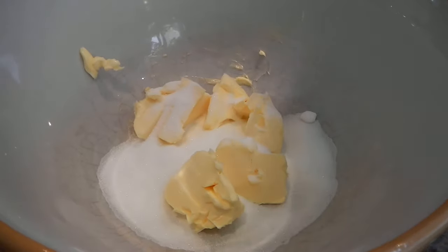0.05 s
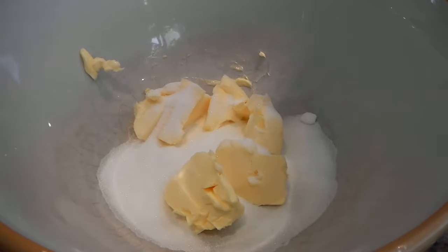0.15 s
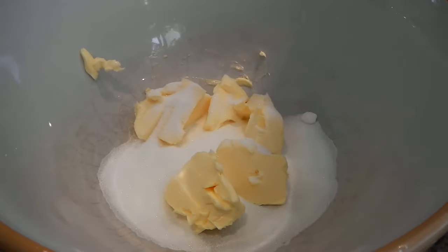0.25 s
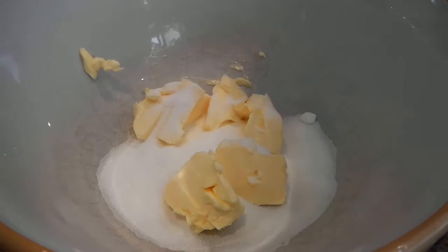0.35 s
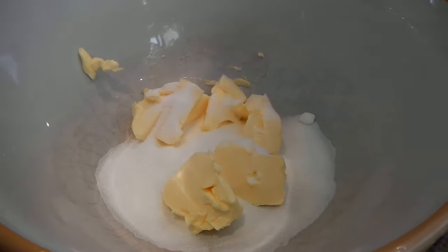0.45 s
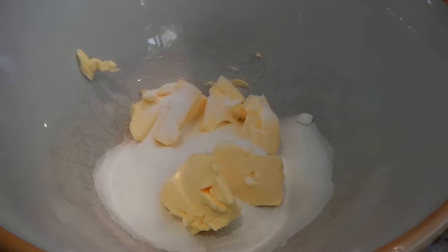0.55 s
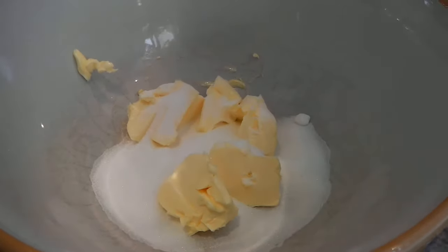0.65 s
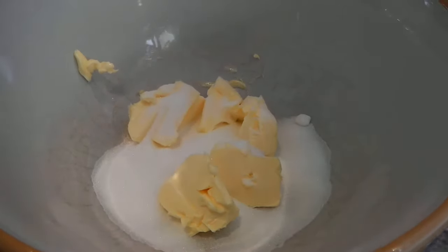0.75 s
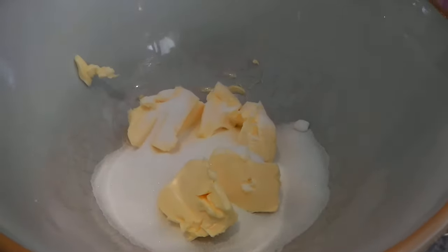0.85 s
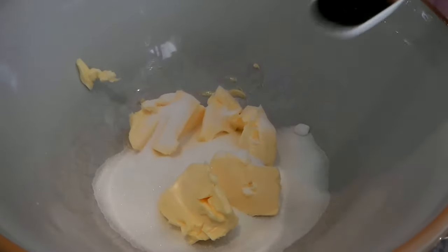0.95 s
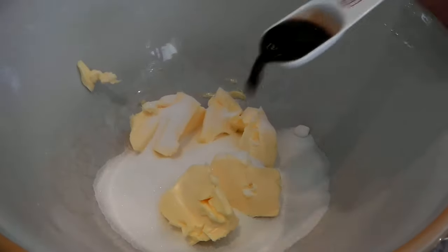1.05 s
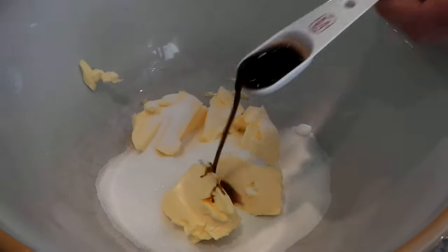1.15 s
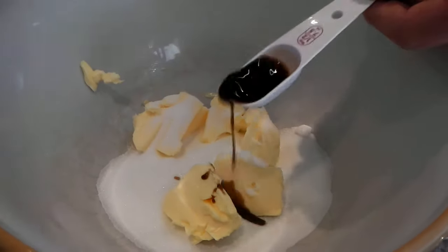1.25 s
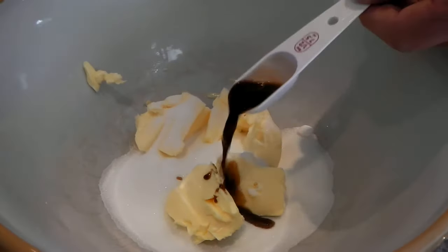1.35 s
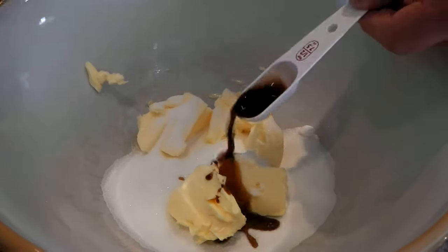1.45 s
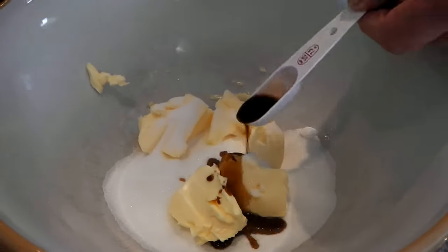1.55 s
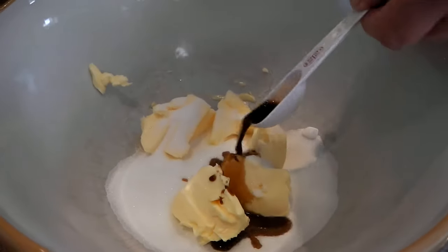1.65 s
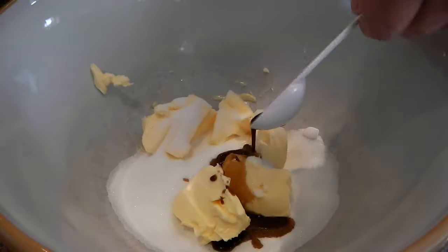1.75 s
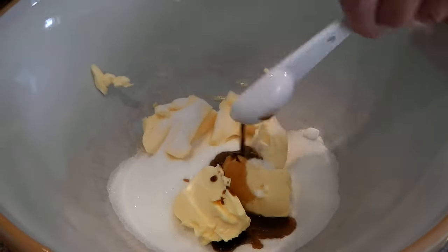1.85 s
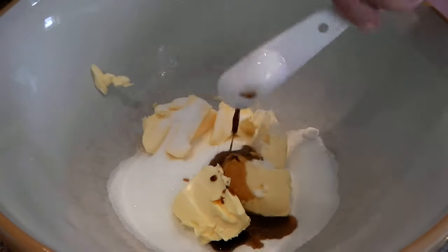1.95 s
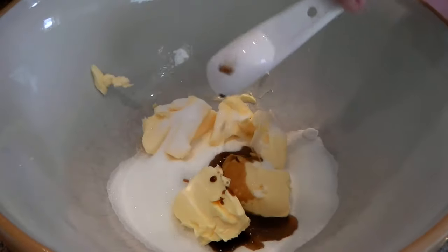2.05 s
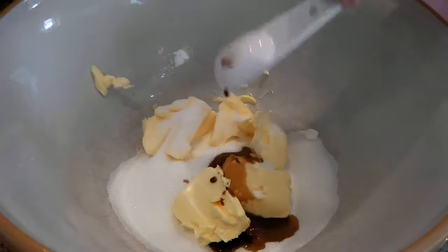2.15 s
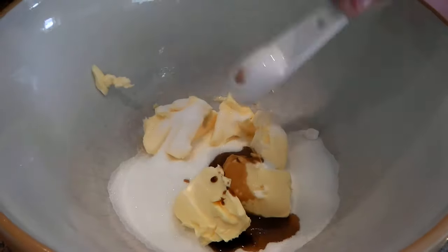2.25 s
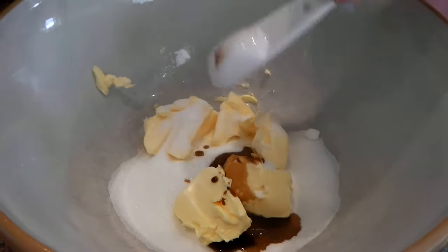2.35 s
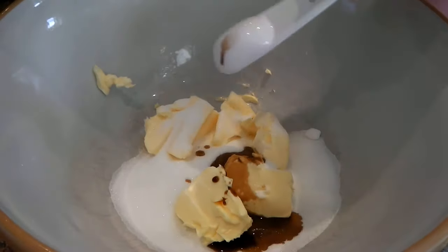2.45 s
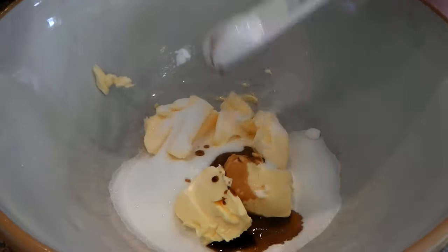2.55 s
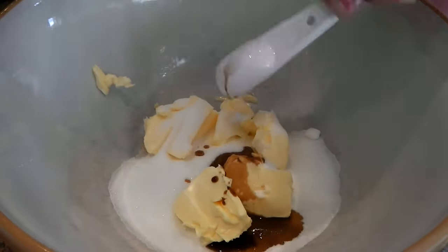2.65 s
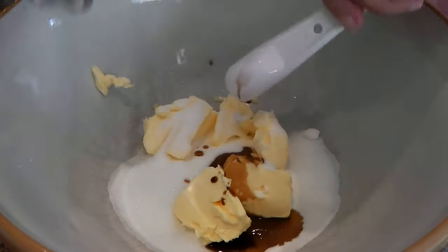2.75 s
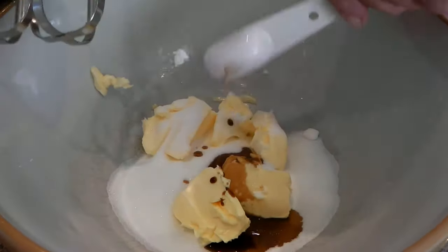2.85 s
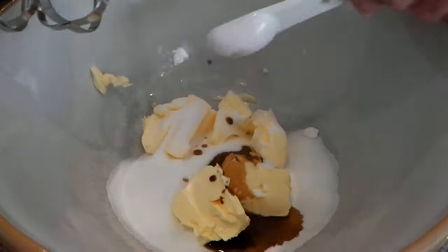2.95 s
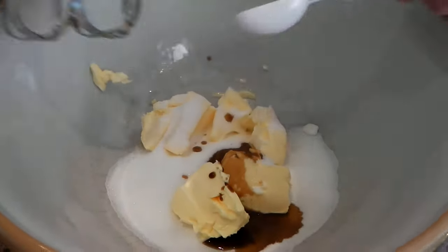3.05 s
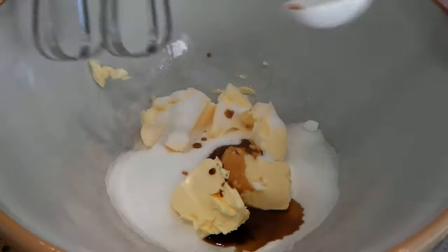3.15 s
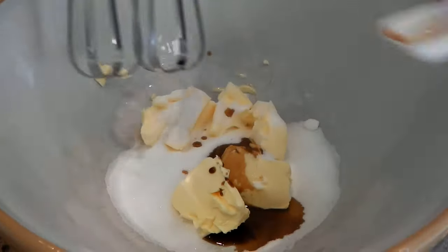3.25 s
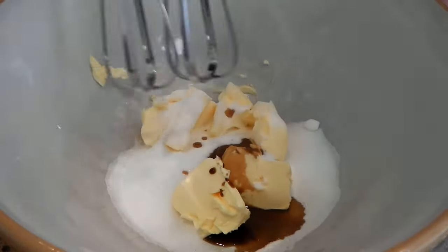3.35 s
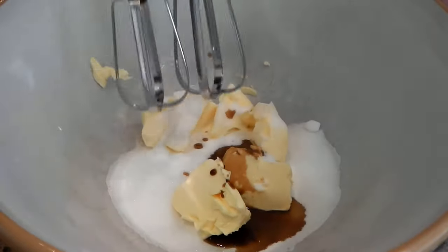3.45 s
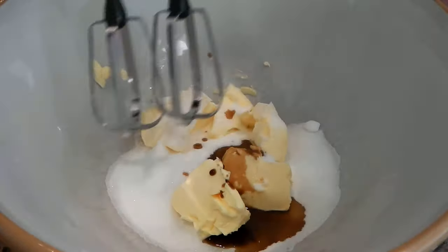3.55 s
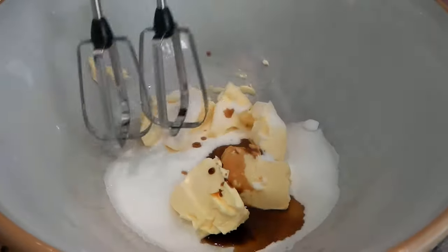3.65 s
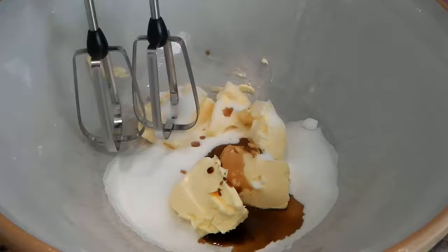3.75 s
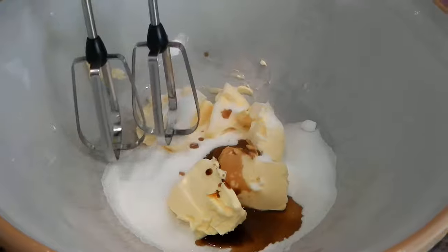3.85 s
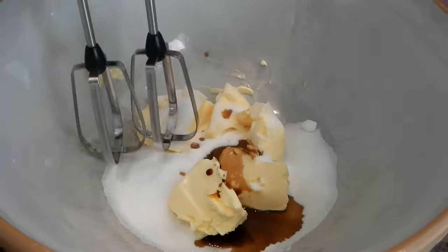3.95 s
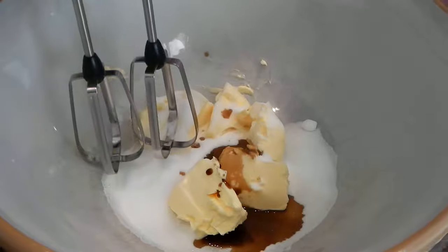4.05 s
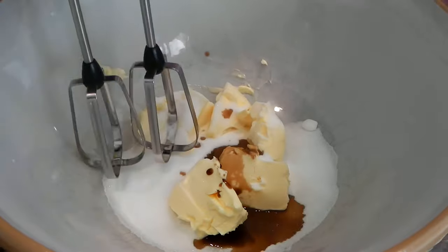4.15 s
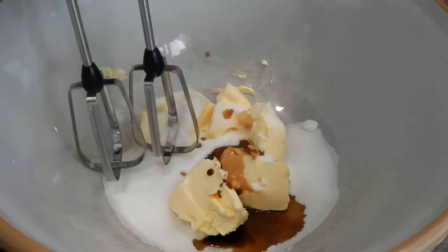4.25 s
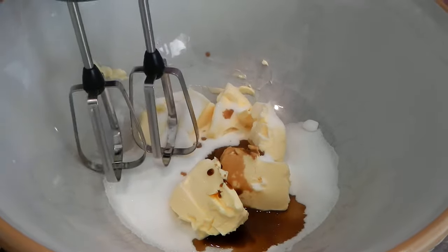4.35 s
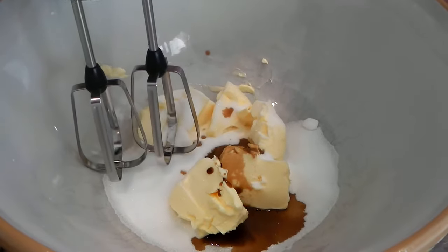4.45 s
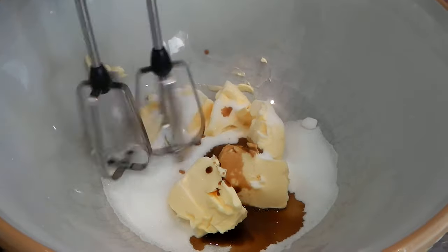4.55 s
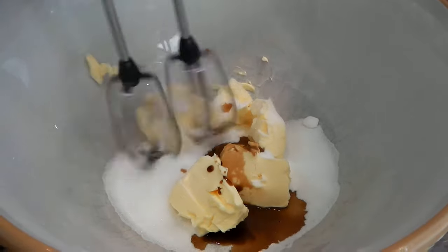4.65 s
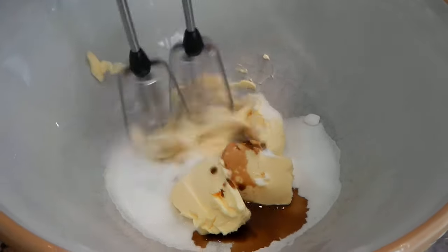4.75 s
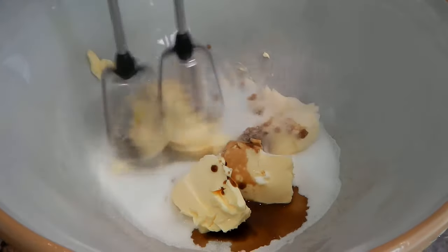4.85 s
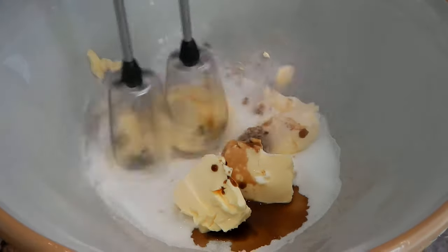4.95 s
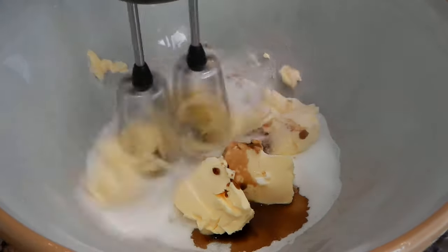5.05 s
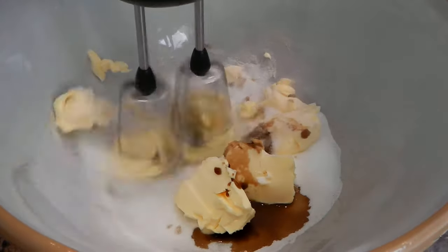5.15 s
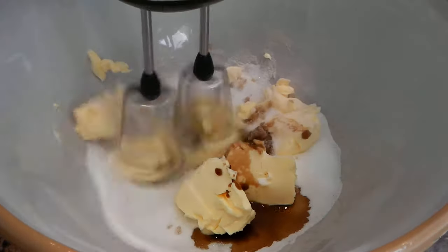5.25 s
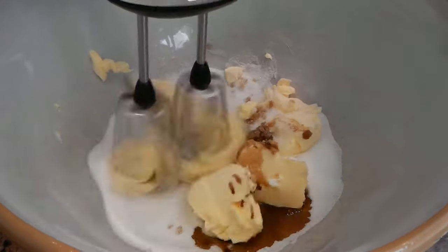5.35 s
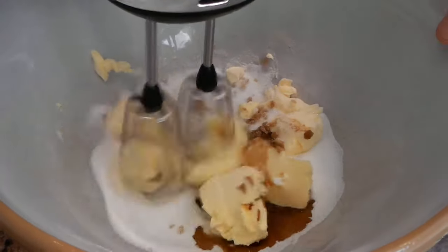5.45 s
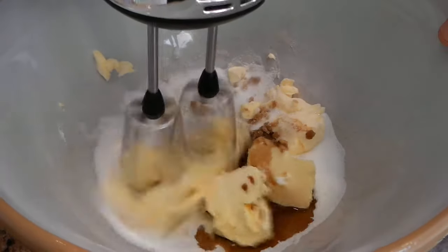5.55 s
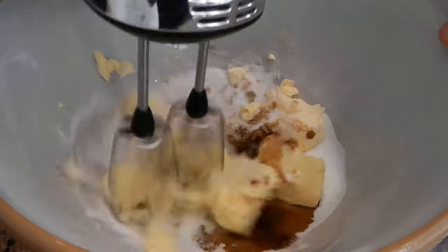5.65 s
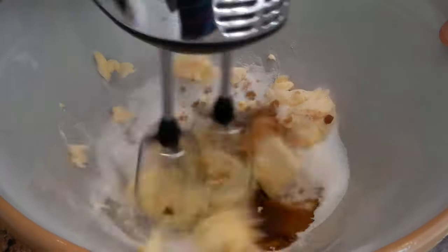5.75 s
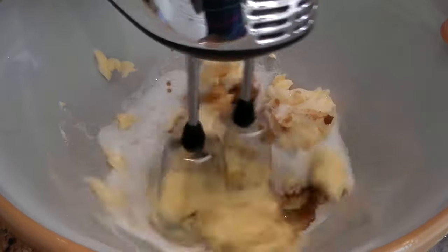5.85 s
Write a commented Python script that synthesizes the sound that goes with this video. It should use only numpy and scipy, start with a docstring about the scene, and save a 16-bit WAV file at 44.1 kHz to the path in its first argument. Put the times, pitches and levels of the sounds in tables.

```python
"""In a quiet kitchen, a spoon clicks and rings as it is emptied into a ceramic bowl of butter and sugar.
A camera's focus motor starts to pip softly, and sleeves rustle. An electric hand mixer is picked up:
its plastic body clicks and knocks, and its steel beaters tap the bowl and rattle in their sockets.
At about 4.5 seconds the switch snaps. The motor growls, then whines up to speed, fluttering with
the mains supply. Last, the beaters sink in and knock the butter about, which slows the motor."""
import sys
import numpy as np
from scipy import signal
from scipy.fft import rfft, irfft, next_fast_len
from scipy.io import wavfile

SR = 44100
rng = np.random.default_rng(int(sys.argv[2]) if len(sys.argv) > 2 else 0)


def file_out(sig):
    """Save sig as 16-bit WAV at sys.argv[1]."""
    # one column per channel
    cols = np.atleast_2d(sig).T
    # limit, then scale
    lim = np.clip(cols, -1, 1)
    pcm = np.round(lim * 32767).astype(np.int16)
    wavfile.write(sys.argv[1], SR, pcm)


N = 260190
TIME = np.arange(N) / SR
PADDED = next_fast_len(N + 8192, True)
HZ = np.fft.rfftfreq(PADDED, 1 / SR)
SWITCH_ON_S = 4.468

# The motor's tones. Each row: multiple of the shaft speed (rounded when used), level in dB when
# running free, level in dB under full load.
MOTOR_TONES = [(3, -29, -45), (4.95, -44, -43), (6, -34, -50.5), (7, -36, -45.5), (9, -42.5, -41.5),
               (13.7, -50, -39.5), (18, -67, -52), (24, -35, -29.5), (28, -58, -35), (30, -60, -51),
               (36, -39.5, -23), (40, -57, -35), (41, -60, -54), (48, -39, -39), (60, -47, -49.5),
               (72.4, -41.5, -62)]
# How well the mixer's case gives off those tones. Each row: frequency in Hz, gain in dB.
HOUSING_GAIN = [(300, -24), (1100, -2.5), (3000, 6), (4750, 0.5), (5700, -9), (7000, 0), (8300, -4),
                (9100, -1), (10600, 4), (11500, 3), (13500, 10), (15200, 10)]
# A quick and a slow stage of speeding up. Each row: turns a second to gain, time constant in seconds.
SPIN_UP_STAGES = [(64.4, .07), (151.4, .361)]
# How deep the beaters sit in the butter. Each row: time in seconds, load from 0 to 1.
BUTTER_LOAD = [(4.85, 0.13), (5.5, 0.88)]
# Lumps caught by the beaters. Each row: middle in seconds, half length in seconds,
# turns a second lost, churning level in dB.
BUTTER_LUMPS = [(4.842, 0.035, 2.77, -39.5), (5.001, .075, 5.2, -52), (5.29, .04, 0.19, -41),
                (5.65, 0.0487, 3.086, -32), (5.834, 0.1, 13.7, -37.5)]

# A colour says how strong a noise is from bass to treble. Each row: frequency in Hz, level in dB.
RUSH_COLOUR = [(150, -26), (300, -17.5), (420, -6), (750, -7), (1150, -2), (1750, -6), (2350, -1.5),
               (2700, -1), (3300, -7), (5300, -5.5), (6200, -9), (8200, -8), (9050, -1), (9800, -5.5),
               (11500, -10), (15500, -12)]  # motor brushes and gears
GROWL_COLOUR = [(120, -66), (200, -25), (456, -29), (735, -8.5), (933, -9.5), (1400, -2), (1910, -19),
                (2380, -7), (4120, -19), (5730, -13.5), (7830, -21.5), (9060, -13), (16000, -24.5)]  # the motor starting
CHURN_COLOUR = [(25, -32), (42, -19), (80, -1), (150, -6), (260, -15.5), (600, -17), (2000, -80)]  # butter thrown about
PLASTIC_COLOUR = [(120, -68), (300, -15), (800, -2.5), (1800, 1.5), (4000, 1.5), (10000, -10), (16000, -29)]  # clicks of spoon and mixer body
BODY_KNOCK_COLOUR = [(120, -21), (300, -14.5), (800, 2.5), (1800, -23), (4000, -39), (10000, -49)]  # dull knocks from the mixer's body
SNAP_COLOUR = [(120, -35), (300, -6), (800, -5), (1800, -5.5), (4000, -6), (10000, -13), (16000, -12)]  # the switch
CLOTH_COLOUR = [(25, -5), (60, 1), (150, -3), (280, -9), (500, 2.5), (1000, -1.5), (1400, 1), (2200, -0.5),
                (3300, -5.5), (6000, -10.5), (9000, -19), (15000, -23.5)]  # sleeves and hands
HISS_COLOUR = [(25, -36), (64, -8.5), (110, -5.5), (200, -12.5), (290, -6.5), (400, -1.5), (800, -6),
               (1250, -10), (5000, -14), (7100, -18), (7900, -22.5), (9100, -17.5), (10200, -27),
               (16000, -27)]  # the background

# Modes are the notes a struck thing rings with. A fade time (t60) is how long a drop of 60 dB takes.
# Each row: frequency in Hz, relative level in dB, fade time in seconds.
BEATER_MODES = [(770, -5.5, 0.062), (1687, -18.5, 0.21), (2140, -4, 0.074), (2300, 3, 0.085),
                (2790, 1.5, 0.04), (3820, -7, 0.076), (4000, -1.5, 0.053), (4470, -1.5, 0.078),
                (5060, 3, 0.092), (4720, -8, 0.061), (5570, -1.5, 0.069), (6350, -4, 0.035),
                (7100, -3, 0.052), (8900, -15, 0.05), (10300, -32, .07), (12830, -25, .07)]
BOWL_MODES = [(716, -27.5, 0.08), (990, -18, 0.0082), (1350, -27, 0.035), (1950, -20, 0.014),
              (2240, -38.5, 0.78), (3120, -8, 0.013), (3860, -4.5, 0.011), (4300, -5, 0.013),
              (5460, -15.5, 0.021), (6100, -22, 0.009), (9400, -27, 0.0091), (12900, -21, 0.011)]
SPOON_MODES = [(2780, 2, 0.24), (3820, -8, .15), (4800, 1, 0.24), (5600, -1, 0.18)]

# Loose beaters rattling. Each row: start in seconds, relative level in dB, brightness in dB an octave.
BEATER_CLINKS = [(4.223, -22, 2.5), (4.242, -27, -0.5), (4.254, -27.5, -5), (4.348, -37, -8.5),
                 (4.360, -41, -10.5), (4.4215, -18.5, 1), (4.431, -26.5, -6.5), (4.438, -25.5, 2)]
# Plastic clicks of spoon and mixer body. Each row: start in seconds, relative level in dB,
# brightness in dB an octave, fade time in seconds.
PLASTIC_CLICKS = [(0.805, -24.5, -0.2, 0.021), (1.125, -41.5, -4.5, .045), (1.418, -41, -5, .03),
                  (1.431, -34, -1.5, .039), (2.689, -37.5, -8.5, 0.026), (3.376, -29, -1, 0.01),
                  (3.382, -27.5, 0, 0.02), (3.487, -32.5, 2, 0.042), (3.638, -36.5, -5, 0.031),
                  (3.674, -34, -3, .025), (3.863, -28, 1, 0.038), (4.058, -30.5, -4, 0.022)]
# Dull knocks from the mixer's body as it is handled. Each row: start in seconds,
# relative level in dB, fade time in seconds.
BODY_KNOCKS = [(3.863, -30, 0.046), (3.965, -28, 0.04), (4.001, -31.5, 0.039), (4.026, -34.5, 0.052),
               (4.045, -29.5, 0.022)]
# Soft bumps on worktop and bowl. Each row: start in seconds, level in dB, frequency in Hz.
SOFT_BUMPS = [(0.938, -40.5, 111), (1.257, -35.5, 136), (1.283, -39, 130), (4.817, -46, 99),
              (5.288, -29, 85.5), (5.612, -47, 143), (5.675, -32, 120)]
# Large steps of the focus motor. Each row: time in seconds, level in dB.
FOCUS_PIPS = [(1.246, -36.5), (1.279, -33), (1.345, -35.5), (1.412, -38.5), (1.445, -32.5), (1.513, -32.5),
              (1.611, -40), (2.079, -32.5), (2.812, -31), (3.314, -35.5), (3.345, -37), (3.38, -38),
              (3.415, -32.5), (3.715, -33.5), (4.146, -32.5), (4.314, -38.5), (4.381, -30.5)]
# Runs of medium steps as it hunts for focus. Each row: start in seconds, end in seconds, level in dB.
FOCUS_HUNTS = [(1.83, 2.0, -42.5), (2.53, 2.73, -46.5), (3.565, 3.665, -43.5)]
# Sleeves and hands brushing along. Each row: loudest moment in seconds, level in dB,
# rise in seconds, fall in seconds, treble gain in dB.
CLOTH_STROKES = [(1.243, -43, 0.027, 0.045, 6.5), (1.44, -47, 0.033, 0.041, -3),
                 (1.54, -49.5, 0.034, 0.032, -12), (1.638, -44.5, 0.028, 0.068, -8.5),
                 (2.59, -52.5, 0.02, 0.032, 4), (3.0, -51.5, 0.07, 0.084, -1),
                 (3.29, -51.5, 0.027, 0.032, 3), (3.395, -44, .03, 0.057, -10),
                 (3.66, -73, 0.078, 0.077, 4), (4.05, -52.5, 0.19, 0.042, -2), (4.45, -59, 0.2, 0.032, 0)]

# The kitchen's echo. Each row: frequency in Hz, fade time in seconds.
KITCHEN_FADE = [(200, 0.62), (2000, 0.26), (6000, 0.22), (14000, 0.083)]
# How alike left and right are. Each row: frequency in Hz, likeness (1 same, 0 unrelated, -1 opposite).
SOURCE_LIKENESS = [(60, .97), (400, .94), (1400, .99), (2300, .96), (3100, .72), (5500, .68), (9000, .45),
                   (15000, .4)]
HISS_LIKENESS = [(60, 0.16), (170, 0.19), (300, -0.35), (5000, -0.48), (15000, -0.05)]
# Which side the motor is louder on. Each row: frequency in Hz, left minus right in dB.
MOTOR_BALANCE = [(100, 1.5), (2400, -1.5), (2700, 1), (3300, 0), (5400, -3), (9000, -3), (15000, -2)]
# Which side its sound reaches first. Each row: frequency in Hz, lead of the left side in radians.
MOTOR_PHASE_LEAD = [(100, .1), (2350, 0), (2660, 1.2), (2850, -.6), (3700, -.2), (5400, -.7), (7500, -1),
                    (10000, -2), (14000, -1.5)]


def mixer():
    """The motor starts with a growl; its whine, tones and rush then follow the speed of the shaft."""
    speed = shaft_speed()
    turns = np.cumsum(speed * (1 + .0015 * drift(25))) / SR
    load = np.clip(curve(BUTTER_LOAD), 0, 1)
    singing = armature_whine(speed, turns, load) + shaft_tones(turns, load)
    rush = brush_rush(speed, turns)
    fade_in = np.clip((TIME - SWITCH_ON_S) / 0.084, 0, 1)
    # the high starting current makes the motor sing louder
    surge = 1 + 0.26 * np.exp(-np.maximum(TIME - SWITCH_ON_S, 0) / 0.045)
    motor = starting_growl() + fade_in * (rush + surge * singing)
    side = np.array([[.5], [-.5]])  # left, right
    placement = amp(side * read(MOTOR_BALANCE, HZ)) * np.exp(1j * side * read(MOTOR_PHASE_LEAD, HZ))
    return kitchen(filtered(motor, placement), wet_db=-9.5)


def shaft_speed(top_speed=245.3, load_droop=16.5):
    """Speed in turns a second: the motor spins up, sags under load and is slowed by each lump."""
    since_on = np.maximum(TIME - SWITCH_ON_S, 0)
    free = top_speed - sum(gap * np.exp(-since_on / lag_s) for gap, lag_s in SPIN_UP_STAGES)
    lump_drag = sum(lost * lump_shape(s, half_s) for s, half_s, lost, _ in BUTTER_LUMPS)
    return free - load_droop * curve(BUTTER_LOAD) - lump_drag


def armature_whine(speed, turns, load, slots=12, peak_hz=2690, width_hz=186, boost_db=10):
    """The slots of the spinning core whine, swelling near the pitch at which the case resonates."""
    phase = 2 * np.pi * slots * turns + .36 * drift(140)
    resonance_db = boost_db / (1 + ((slots * speed - peak_hz) / width_hz) ** 2)
    flutter = (1 - load) * mains(.7) + load * mains(.85)  # the pulses bite harder under load
    return np.cos(phase) * flutter * amp(-27 + resonance_db + 2.0 * drift(140))


def shaft_tones(turns, load):
    """Tones at whole multiples of the shaft speed sound through the case; load changes their mix."""
    tones = np.zeros(N)
    for multiple, free_db, loaded_db in MOTOR_TONES:
        wobble = (.5 + multiple / 160) * drift(70)
        phase = 2 * np.pi * np.round(multiple) * turns + wobble + rng.uniform(0, 2 * np.pi)
        level_db = free_db + load * (loaded_db - free_db) + 4.1 * drift(14)
        tones += np.sqrt(2) * amp(level_db) * np.cos(phase)
    return filtered(tones, amp(read(HOUSING_GAIN, HZ))) * mains(0.23)


def brush_rush(speed, turns, cruise_speed=220, db_per_doubling=12.5, buzz_db=-7):
    """The motor's brushes scrape unevenly round each turn; brushes and gears get louder with speed."""
    angle = 2 * np.pi * turns
    scrape = 1 + 0.1 * np.cos(angle) + 0.11 * np.cos(2 * angle) + 0.28 * np.cos(3 * angle)
    rush = noise(RUSH_COLOUR) * scrape + amp(buzz_db) * coloured(gear_buzz(turns), RUSH_COLOUR)
    level_db = -22.5 + db_per_doubling * np.log2(speed / cruise_speed) + 0.97 * drift(22.6)
    return rush * mains(0.01) * amp(level_db)


def gear_buzz(turns, harmonics=90):
    """The same small bumps in the brushes and worm gear come round with every turn."""
    one_turn = signal.resample(rng.standard_normal(2 * harmonics), 4096)
    return np.interp(turns, np.arange(4096) / 4096, one_turn, period=1)[None]


def starting_growl(rise_s=0.035, hold_until_s=.092, drop_s=0.015, tail_s=0.049, tail_share=0.52):
    """The starting current shakes the motor: it builds, holds, drops and leaves a slower tail."""
    since_on = TIME - SWITCH_ON_S
    since_hold = np.maximum(since_on - hold_until_s, 0)
    rise = np.clip(since_on / rise_s, 0, 1) ** 2
    fall = (1 - tail_share) * np.exp(-since_hold / drop_s) + tail_share * np.exp(-since_hold / tail_s)
    return amp(-18.5) * noise(GROWL_COLOUR) * mains(.75) * rise * fall


def mains(sharpness):
    """The 50 Hz mains supply pulls the motor twice a cycle, so it pulses 100 times a second."""
    pulses = np.exp(sharpness * np.cos(2 * np.pi * 100 * (TIME - .0035)))
    return pulses / np.sqrt(np.i0(2 * sharpness))


def butter(free_db=-54, loaded_db=-38):
    """Butter is thrown against the bowl, louder as the beaters sink in and with each lump."""
    steady = amp(free_db + curve(BUTTER_LOAD) * (loaded_db - free_db)) * (TIME > SWITCH_ON_S)
    lump_power = sum(amp(db) ** 2 * lump_shape(s, half_s) for s, half_s, _, db in BUTTER_LUMPS)
    return noise(CHURN_COLOUR) * np.sqrt(steady ** 2 + lump_power) * amp(2.0 * drift(26))


def lump_shape(middle_s, half_s):
    """A smooth rise and fall as one lump passes through the beaters."""
    return np.exp(-((TIME - middle_s) / half_s) ** 2)


def beater_clinks(rise_s=0.00033):
    """The steel beaters rattle in their sockets; each new seating shifts their notes a little."""
    out, t = np.zeros((2, N)), np.arange(SR // 2) / SR
    for s, db, bright_db in BEATER_CLINKS:
        chatter = 0.79 * stereo(len(t)) * np.exp(-t / 0.015)
        soft_chatter = signal.lfilter([.5], [1, -.6], chatter)
        # loose contact makes the ring flutter in loudness
        contact = 1 + .45 * np.interp(t, t[::90], rng.standard_normal(len(t[::90])))
        rattle = contact * ring(BEATER_MODES, bright_db, detune=.012) + soft_chatter
        add(out, s, amp(db - 11.5) * rattle * (1 - np.exp(-t / rise_s)))
    return kitchen(out * pan(-2.0), wet_db=-9.5)


def spoon_and_bowl_taps(spoon_at_s=1.125, bowl_at_s=3.8208, rise_s=0.0003):
    """The spoon rings faintly; later a beater hits the full bowl with a hard, short ping."""
    out, t = np.zeros((2, N)), np.arange(SR // 2) / SR
    onset = 1 - np.exp(-(t / rise_s) ** 2)
    add(out, spoon_at_s, amp(-53.5) * onset * ring(SPOON_MODES, bright_db=-3.0, detune=0.0036))
    add(out, bowl_at_s, amp(-6) * onset * ring(BOWL_MODES, bright_db=-1.0, detune=0.0036))
    return kitchen(out * pan(-5.0), wet_db=-7.5)


def clicks_and_knocks():
    """Plastic clicks, dull knocks from the mixer's body and the switch's snap: bursts of noise."""
    out = np.zeros((2, N))
    for s, db, bright_db, t60 in PLASTIC_CLICKS:
        add(out, s, amp(db) * crack(PLASTIC_COLOUR, t60, bright_db))
    for s, db, t60 in BODY_KNOCKS:
        add(out, s, amp(db) * crack(BODY_KNOCK_COLOUR, t60))
    add(out, SWITCH_ON_S, amp(-11) * crack(SNAP_COLOUR, t60=0.038))
    return kitchen(out * amp(-7), wet_db=-6.5)


def bumps(cycles=2.4):
    """Dull pushes swing the worktop or bowl briefly to and fro."""
    out = np.zeros(N)
    for s, db, hz in SOFT_BUMPS:
        t = np.arange(int(cycles * SR / hz)) / SR
        add(out, s, amp(db) * np.hanning(len(t)) * np.sin(2 * np.pi * hz * t))
    return out


def focus_motor(from_s=1.2448, to_s=4.4, every_s=.033366, pitch_hz=430, step_s=0.018, ring_s=0.048):
    """Each step of the focus motor hums through the camera body; small steps fill the gaps."""
    out, t = np.zeros(N), np.arange(SR // 12) / SR
    progress = np.minimum(t / step_s, 1)
    swell = np.sin(np.pi * progress) ** 2 + 0.15 * progress * np.exp(-abs(t - step_s) / ring_s)
    step_times = np.arange(from_s, to_s, every_s)
    size, detune = rng.standard_normal((len(step_times), 2)).T
    level_db = np.full(len(step_times), -51.5)  # small steps
    for start, end, db in FOCUS_HUNTS:
        level_db[(step_times > start) & (step_times < end)] = db
    level_db += 3.5 * size
    for s, db in FOCUS_PIPS:
        level_db[np.argmin(abs(step_times - s))] = db  # the nearest step becomes a large one
    for s, db, hz in zip(step_times, level_db, pitch_hz * (1 + 0.02 * detune)):
        add(out, s - .002, amp(db) * swell * np.sin(2 * np.pi * hz * t))
    return out * pan(-8.0)


def rustle(treble_hz=4500, steady_db=-64):
    """Cloth and skin brush along in small uneven grains; each stroke swells and dies away."""
    cloth = noise(CLOTH_COLOUR)
    treble = filtered(cloth, HZ ** 2 / (HZ ** 2 + treble_hz ** 2))
    out = amp(steady_db) * cloth
    for s, db, rise_s, fall_s, treble_db in CLOTH_STROKES:
        swell = np.exp(-np.maximum((s - TIME) / rise_s, (TIME - s) / fall_s))
        out += amp(db) * swell * (cloth + (amp(treble_db) - 1) * treble)
    return out * amp(1.6 * drift(110)) * pan(-0.27)


def kitchen(x, wet_db):
    """The room adds a tail of many echoes, at a level of wet_db; the treble dies first."""
    t = np.arange(SR // 2) / SR
    echoes = stereo(len(t)) * (t > .004)
    hz, s, spectrum = signal.stft(echoes, SR, nperseg=256)
    fade = amp(-60 * s / read(KITCHEN_FADE, hz)[:, None])
    tail = signal.istft(spectrum * fade, SR, nperseg=256)[1]
    return x + amp(wet_db) * signal.fftconvolve(x, tail / np.linalg.norm(tail[0]), axes=1)[:, :N]


def hiss():
    """A quiet, steady noise lies behind everything."""
    return noise(HISS_COLOUR, HISS_LIKENESS) * amp(-57) * pan(1.0)


def ring(modes, bright_db, detune):
    """The fading notes of a struck thing; high ones reach left and right out of step."""
    t = np.arange(SR // 2) / SR
    hz, db, t60 = np.transpose(modes)[:, :, None]
    hz = hz * (1 + detune * rng.standard_normal(hz.shape))
    phase = rng.uniform(0, 2 * np.pi, hz.shape) + rng.standard_normal((2,) + hz.shape) * hz / 8000
    level_db = db + bright_db * np.log2(hz / 4000) - 60 * t / t60
    return (amp(level_db) * np.sin(2 * np.pi * hz * t + phase)).sum(1)


def crack(colour, t60, bright_db=0):
    """A short burst of noise in the colour of the struck part; its first 3 ms have strength 1."""
    t = np.arange(4096) / SR
    hz = abs(np.fft.fftfreq(len(t), 1 / SR))
    gain = amp(read(colour, hz) + bright_db * np.log2(np.maximum(hz, 800) / 800))
    body = np.exp(np.conj(signal.hilbert(np.log(gain))))  # rings only after the blow
    blow = stereo(len(t)) * amp(-60 * t / t60) * (1 - np.exp(-t / 0.0011))
    burst = irfft(rfft(blow) * body[:len(t) // 2 + 1])
    return burst / burst[:, t < .003].std()


def noise(colour, likeness=SOURCE_LIKENESS):
    """Stereo noise of the given colour, as long as the scene."""
    return coloured(stereo(N, likeness), colour)


def stereo(size, likeness=SOURCE_LIKENESS):
    """Left and right white noise, alike at each frequency by the given amount."""
    a, b = rfft(rng.standard_normal((2, size)))
    same = np.clip(read(likeness, np.fft.rfftfreq(size, 1 / SR)), -1, 1)
    return irfft(np.array([a, same * a + np.sqrt(1 - same ** 2) * b]), size)


def drift(rate_hz):
    """A random wander of strength (rms) 1, mostly slower than rate_hz."""
    slow_hz = HZ[HZ < 800]
    a, b = rng.standard_normal((len(slow_hz), 2)).T
    wander = irfft((a + 1j * b) / (1 + (slow_hz / rate_hz) ** 4), PADDED)[:N]
    return wander / np.sqrt(np.mean(wander ** 2) + 1e-20)


def coloured(x, colour):
    """Gives a sound a colour; the average of its channels gets strength 1."""
    x = filtered(x, amp(read(colour, HZ)))
    return x / x.mean(0).std()


def notched(x, notch_hz=7850, width_hz=300):
    """The microphones are deaf in one narrow treble band."""
    distance_squared = (HZ - notch_hz) ** 2
    return filtered(x, distance_squared / (distance_squared + width_hz ** 2))


def filtered(x, gain):
    """Applies one gain for each frequency in HZ."""
    return irfft(rfft(x, PADDED) * gain, PADDED)[..., :N]


def read(table, hz):
    """Looks up frequencies in a table, sliding between its rows on a log scale."""
    row_hz, value = np.transpose(table)
    return np.interp(np.log(hz + 1), np.log(row_hz + 1), value)


def curve(table):
    """Turns rows of time and value into a value for every sample."""
    return np.interp(TIME, *np.transpose(table))


def add(mix, start_s, sound):
    """Mixes a sound in at its start time."""
    part = mix[..., round(start_s * SR):][..., :sound.shape[-1]]
    part += sound[..., :part.shape[-1]]


def pan(db):
    """Left and right gains; a positive db makes the left louder."""
    return amp(np.array([[db], [-db]]) / 2)


def amp(db):
    """Turns decibels into a gain to multiply by."""
    return 10 ** (np.asarray(db) / 20)


def scene():
    """Small sounds, the mixer and the butter, all over a quiet hiss."""
    background = hiss()
    soft_sounds = rustle() + focus_motor() + bumps()
    hits = clicks_and_knocks() + spoon_and_bowl_taps() + beater_clinks()
    return background + notched(soft_sounds + hits + mixer() + butter())


def record(dry):
    """The camera steeply cuts the treble above about 16 kHz."""
    low_pass = signal.firwin(511, 16050, window=("kaiser", 9), fs=SR)
    return signal.oaconvolve(dry, low_pass[None], "same")


dry = scene()
out = record(dry)
file_out(out)
```